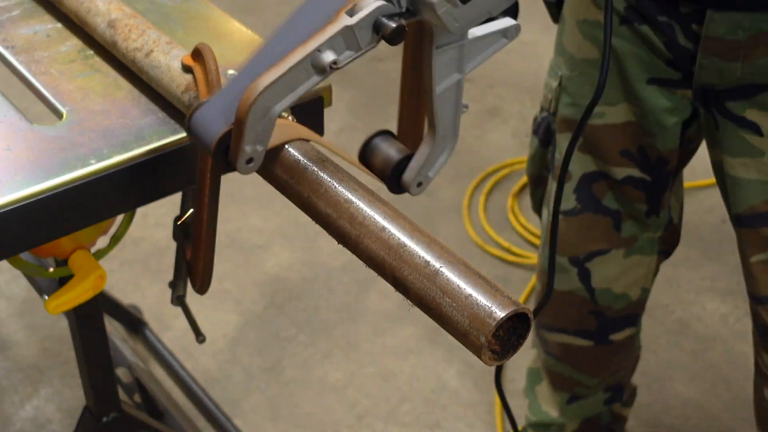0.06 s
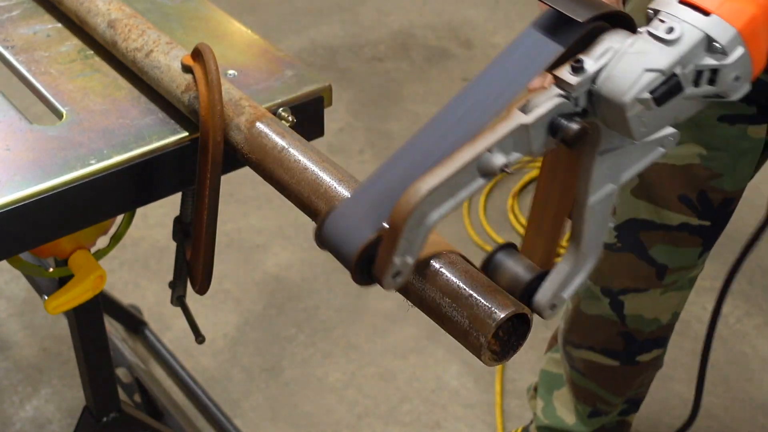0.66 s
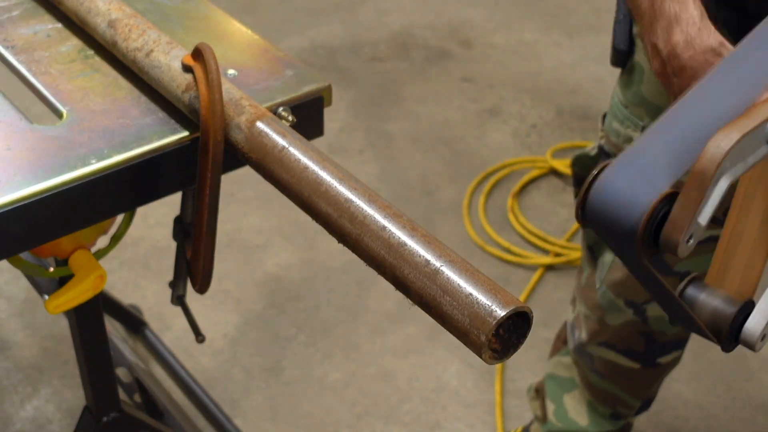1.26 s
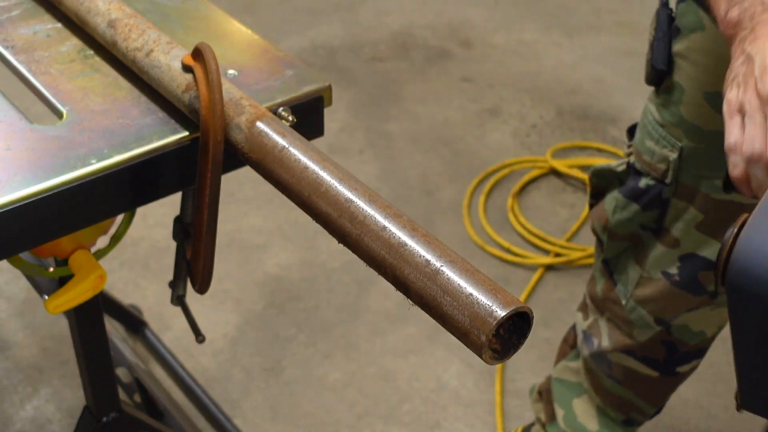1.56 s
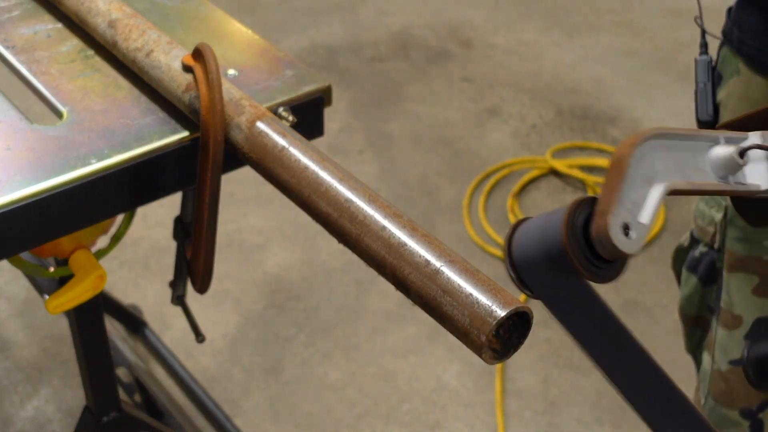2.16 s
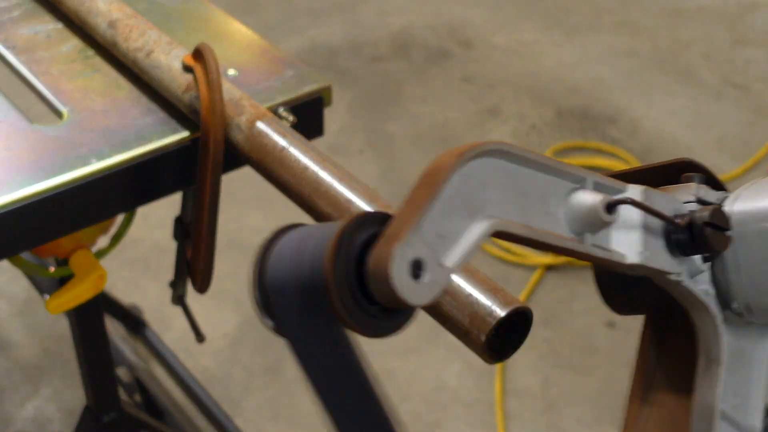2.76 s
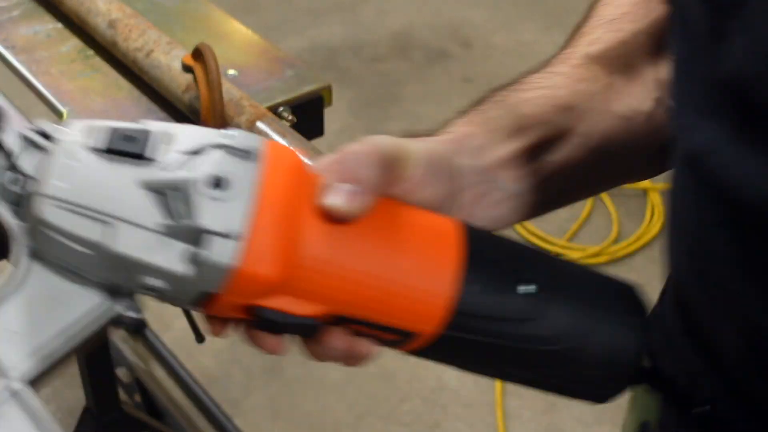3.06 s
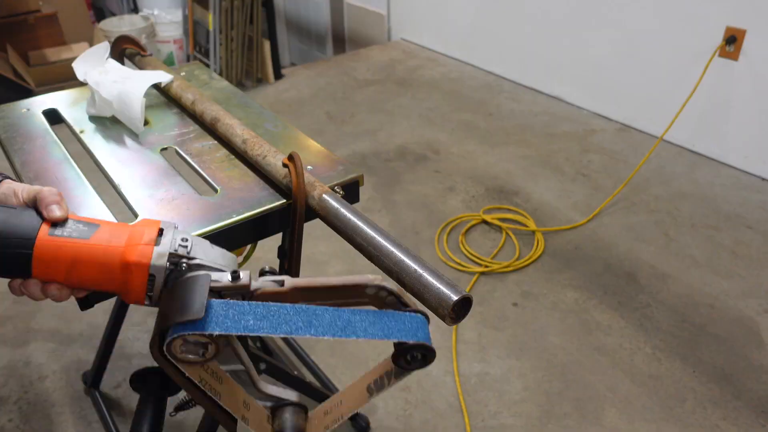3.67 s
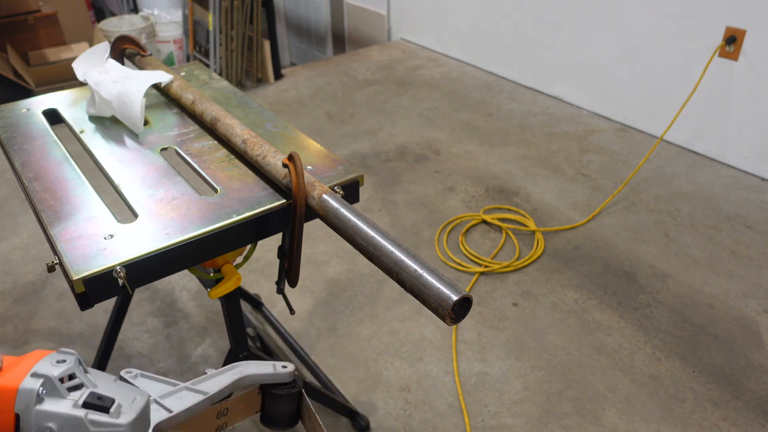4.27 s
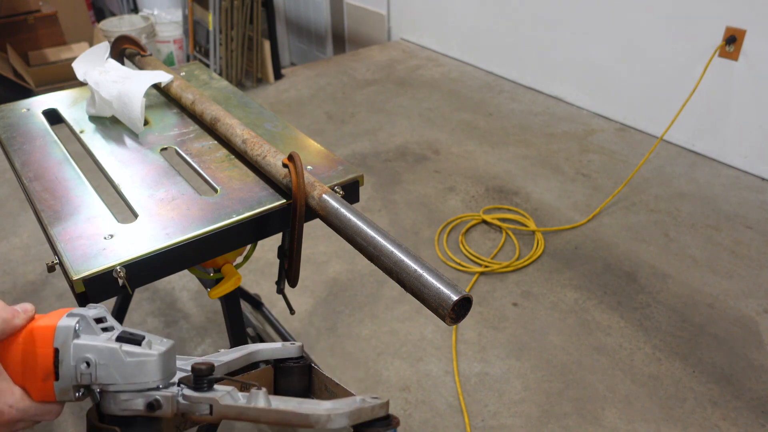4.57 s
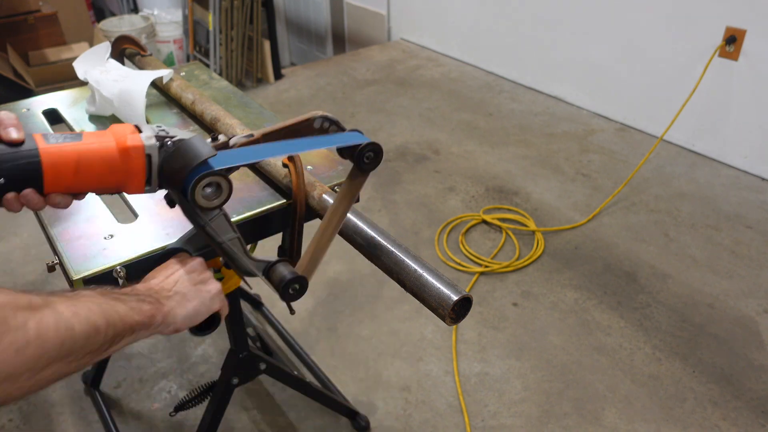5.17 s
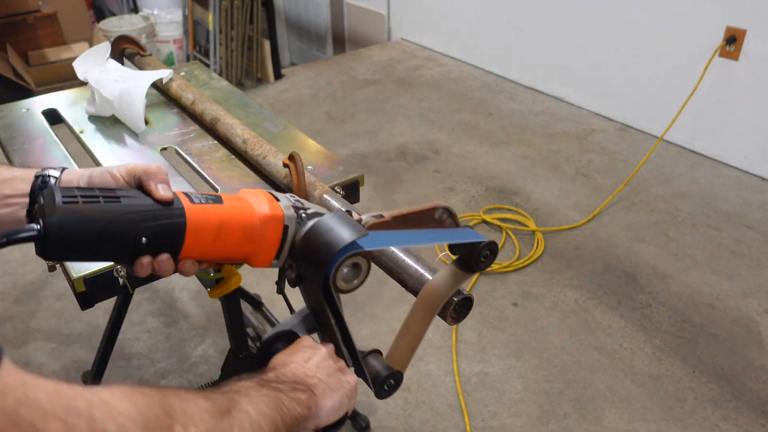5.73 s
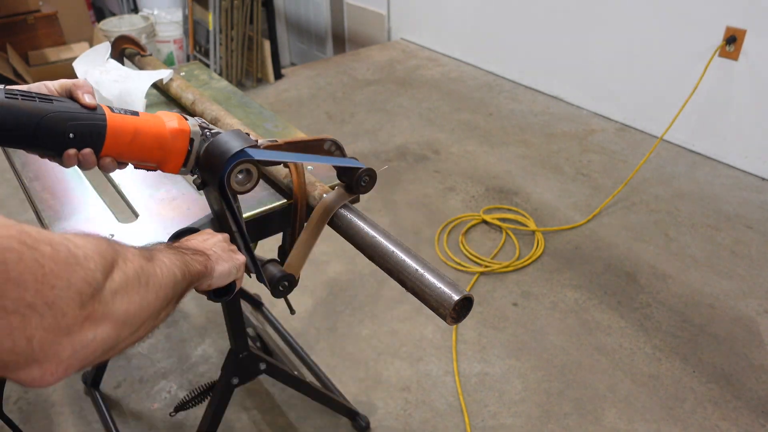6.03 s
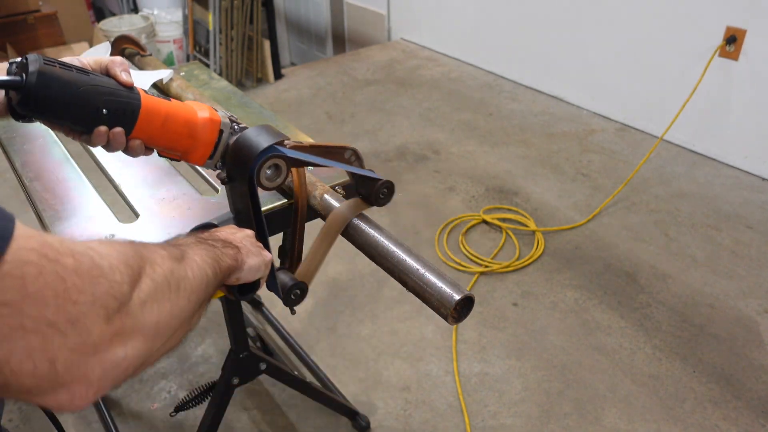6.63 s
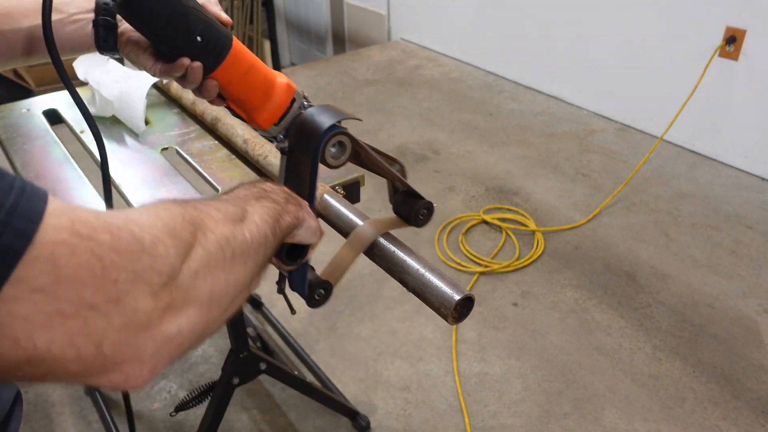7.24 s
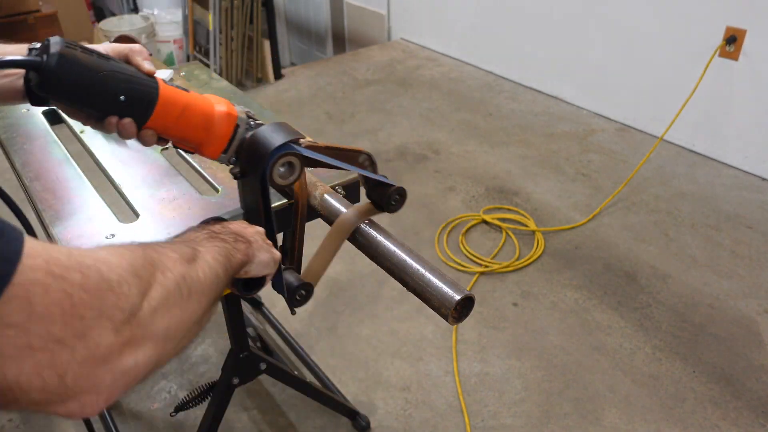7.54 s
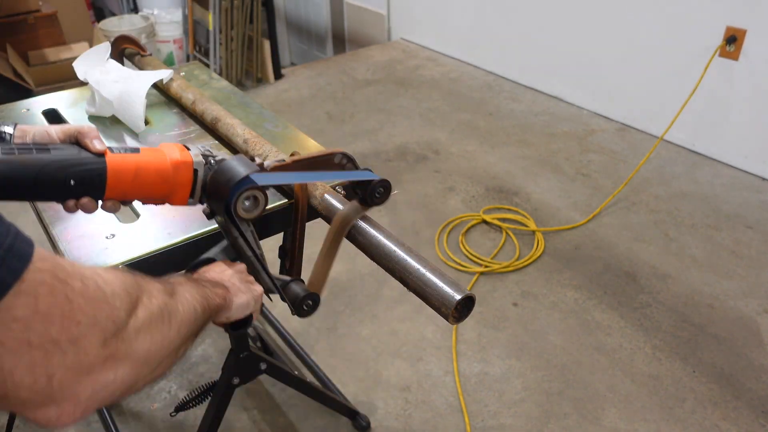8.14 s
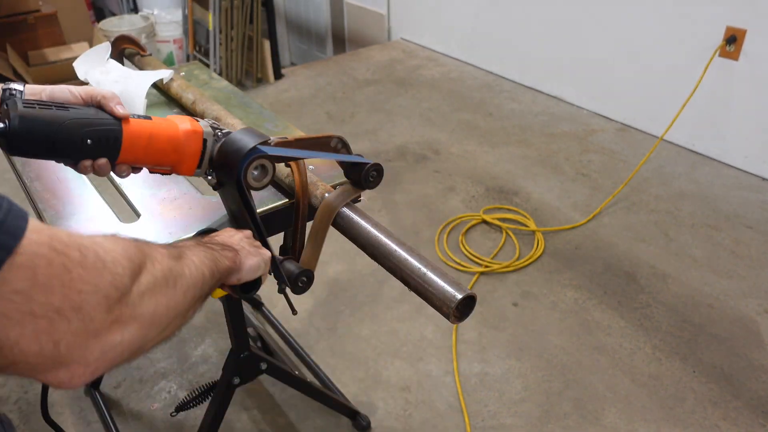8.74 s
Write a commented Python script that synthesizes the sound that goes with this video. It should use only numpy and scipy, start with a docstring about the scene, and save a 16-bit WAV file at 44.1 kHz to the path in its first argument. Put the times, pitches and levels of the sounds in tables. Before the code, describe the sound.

Close by in a quiet workshop, an electric belt sander whines and hisses as its belt rasps against a rusty steel pipe. The motor is cut and falls in pitch, its gears clattering to a stop. A short pause and a few sharp switch clicks follow. The sander then whirs back up and keeps grinding, its pitch wavering with the pressure.

```python
"""A handheld belt sander grinds rust off a steel pipe: the motor whines over fan air, belt rush and
brush hiss, and grit scrapes while the belt touches. It lifts off and runs free; near 2 s power is cut
and it coasts down, slack gears rattling their housing, to a stop at 3.5 s. After a pause in the quiet
room the switch clicks a few times. At 4.8 s the sander spins up, turned another way, and grinds on."""
import sys
import numpy as np
from scipy import signal
from scipy.fft import rfft, irfft
from scipy.io import wavfile
from scipy.ndimage import uniform_filter1d

SR = 44100
rng = np.random.default_rng(int(sys.argv[2]) if len(sys.argv) > 2 else 0)


def int16_out(signal):
    """Quantize to a 16-bit WAV file."""
    q = np.round(np.clip(np.atleast_2d(signal).T, -1, 1) * 32767)
    wavfile.write(sys.argv[1], SR, q.astype(np.int16))


N = 392490
TIME_S = np.arange(N) / SR
OFF_S, SLACK_S, STOP_S = 1.96, 2.25, 3.5  # power cut, gears slack, drive still
FREE_HZ, TOP_HZ = 985, 15750


def undb(db):
    """Decibels to gain."""
    return 10 ** (np.asarray(db) / 20)


def unit(x):
    """Scale to rms 1."""
    return x / np.sqrt(np.mean(x ** 2))


def curve(table, column=1):
    """One table column, interpolated linearly in time."""
    rows = np.array(table)
    return np.interp(TIME_S, rows[:, 0], rows[:, column])


def span(start_s, end_s, edge_s):
    """Smooth gate."""
    return (1 + np.tanh((TIME_S - start_s) / edge_s / 2)) * (1 + np.tanh((end_s - TIME_S) / edge_s / 2)) / 4


def bump(centre_s, width_s):
    """Bell-shaped swell."""
    return np.exp(-((TIME_S - centre_s) / width_s) ** 2)


def walk(rate_hz):
    """Smooth random wander, rms 1."""
    step = max(int(SR / rate_hz), 1)
    held = np.repeat(rng.standard_normal(N // step + 1), step)
    return unit(uniform_filter1d(held, step)[:N])


def grains(per_s, spread_db):
    """Tiny random impacts of unequal size."""
    hits = rng.random(N) < per_s / SR
    return hits * rng.standard_normal(N) * undb(spread_db * rng.standard_normal(N))


def turns(hz):
    """Running cycle count."""
    return np.cumsum(hz) / SR


def colour(x, outline):
    """Filter by a (Hz, dB) outline, falling 12 dB per octave below its first point."""
    hz, db = np.transpose(outline)
    f = np.maximum(np.fft.rfftfreq(len(x), 1 / SR), 1)
    response = undb(np.interp(np.log(f), np.log(hz), db)) * np.minimum(f / hz[0], 1) ** 2
    return irfft(rfft(x) * response, len(x))


def ring(x, modes):
    """Parallel resonances (Hz, width in Hz, dB) of alternating sign."""
    f = np.maximum(np.fft.rfftfreq(N, 1 / SR), 1)
    response = sum((-1) ** k * undb(db) / (1 + 1j * (f * f - hz * hz) / (f * width_hz))
                   for k, (hz, width_hz, db) in enumerate(modes))
    return irfft(rfft(x) * response, N)


def driven(law, hz, load):
    """Gain of a moving part; law is (free dB, loaded dB, exponent of speed)."""
    free_db, loaded_db, exponent = law
    return undb(free_db + (loaded_db - free_db) * load) * (hz / FREE_HZ) ** exponent


# Room noise spectrum. Each row: frequency in Hz, gain in dB.
ROOM_SPECTRUM = [(25, -13), (50, -5), (100, -3.5), (190, -5), (320, -7), (550, -10), (1200, -15),
                 (3000, -22), (6000, -27.5), (9000, -27), (15500, -32)]
def room_tone(level_db):
    """Steady low background noise."""
    return unit(colour(rng.standard_normal(N), ROOM_SPECTRUM)) * undb(level_db)


# Scuffs of the stopping belt and the hands; squeals of the belt on the pipe or rollers.
# Each row: centre in seconds, half-width in seconds, pitch in Hz, bandwidth in Hz, level in dB.
SCUFFS = [(2.64, 0.2, 3750, 650, -44), (3.18, 0.037, 100, 49.5, -67), (3.33, .09, 4850, 200, -60),
          (3.34, 0.06, 6000, 800, -51.5), (3.45, 0.045, 1790, 500, -65.5), (3.543, .012, 9060, 5000, -69),
          (3.89, 0.028, 5800, 702, -78.5)]
SQUEALS = [(.52, .08, 1900, 150, -36), (.72, 0.11, 13000, 1800, -34), (.9, .1, 2890, 250, -35.5),
           (1.04, 0.065, 12800, 1500, -29), (1.25, .08, 2440, 700, -33), (1.68, .07, 2500, 700, -32),
           (2.52, 0.2, 2100, 1000, -39), (4.83, 0.038, 2100, 900, -49), (4.95, .035, 2800, 1500, -39),
           (7.217, 0.23, 4180, 550, -34), (7.725, 0.033, 1714, 300, -39), (7.749, 0.052, 2950, 401, -39),
           (8.8, 0.065, 3200, 200, -39.5)]
def rubbing(swells):
    """Friction excites short swells of rough ringing."""
    bites = grains(9000, spread_db=2)
    return sum(unit(ring(bites, [(hz, bandwidth_hz, 0)])) * undb(db) * bump(centre_s, width_s)
               for centre_s, width_s, hz, bandwidth_hz, db in swells)


# Spectrum of a hard contact. Each row: frequency in Hz, gain in dB.
CONTACT_SPECTRUM = [(100, -13.5), (500, -0.5), (2000, -6), (5000, -8), (7500, -2.5), (11000, -11),
                    (15500, -1)]
# Switch clicks. Each row: start in seconds, peak in dB, tilt in dB per octave.
CLICKS = [(4.405, -29, 1.5), (4.4512, -57, 1), (4.4552, -50, 2), (4.4592, -41, 0.5), (4.469, -46, 2),
          (4.479, -22, 3), (4.6495, -32.5, 1), (4.7105, -39, 1.5)]
def switch(snap_s, body_s, body_db, tail_s, tail_db):
    """Each click is a sharp snap, a short plastic ring and a faint room tail."""
    out, t = np.zeros(N), np.arange(SR // 8) / SR
    decay = np.exp(-t / snap_s) + undb(body_db) * np.exp(-t / body_s)
    decay += undb(tail_db) * np.exp(-t / tail_s)
    lead = SR // 200
    for start_s, peak_db, tilt_db in CLICKS:
        burst = np.pad(decay * rng.standard_normal(len(t)), (lead, 0))
        click = colour(burst, [(hz, db + tilt_db * np.log2(hz)) for hz, db in CONTACT_SPECTRUM])
        start = int(start_s * SR) - lead
        out[start:start + len(click)] += undb(peak_db) * click / np.abs(click).max()
    return out


# Modes of the sander's arm. Each row: frequency in Hz, width in Hz, gain in dB.
ARM_MODES = [(105, 18, -12.5), (217, 21, 8), (370, 66, -1.5), (470, 48, 4)]
# Spells of droning. Each row: start in seconds, end in seconds, level in dB.
DRONES = [(2.13, 2.38, -62.5), (2.4, 3.1, -74), (4.818, 5.246, -64.5)]
def arm_drone():
    """The arm resonates during parts of the coast and the run-up."""
    envelope = sum(undb(db) * span(start_s, end_s, edge_s=.025) for start_s, end_s, db in DRONES)
    return unit(ring(rng.standard_normal(N), ARM_MODES)) * envelope


# Gear housing modes. Each row: frequency in Hz, width in Hz, gain in dB.
HOUSING_MODES = [(830, 182, -9), (1660, 110, 0.5), (2390, 600, -7), (3750, 610, -1.5), (4570, 160, 0.5),
                 (4900, 120, 3.5), (5300, 200, -1.5), (5706, 180, 2.5), (6340, 300, 1), (7060, 209, 4),
                 (7520, 256, -1), (7900, 800, -3), (8720, 350, 0), (9230, 280, -1), (10220, 400, -4),
                 (11100, 450, -5.5), (12120, 400, -2), (13200, 1100, -5), (15500, 1200, -13.5)]
def housing(force, direct_db):
    """The housing rings; a little of each contact is heard directly."""
    return ring(force, HOUSING_MODES) + undb(direct_db) * colour(force, CONTACT_SPECTRUM)


def knocks(rate_hz, decay_s, scatter_db):
    """One decaying pulse of random size per cycle."""
    cycle, phase = np.divmod(turns(rate_hz), 1)
    size = undb(scatter_db * rng.standard_normal(N))[cycle.astype(int)]
    return size * np.exp(-phase / rate_hz / decay_s)


# Bouts of gear rattle. Each row: centre in seconds, half-width in seconds, level in dB.
RATTLES = [(2.79, 0.044, -41), (2.97, 0.041, -42.5), (3.043, 0.046, -40.5), (3.166, 0.07, -47.5),
           (3.35, 0.069, -54.5)]
def gears(hz, level_db, rub_db, ratio, slowest_hz, fade_from_s, fade_db_per_s):
    """Slack teeth knock unevenly and ring the housing, over the rub of the slowing belt."""
    rate_hz = np.maximum(hz / ratio, slowest_hz) * undb(2 * walk(90))
    teeth = knocks(rate_hz, decay_s=.0017, scatter_db=3.5)
    force = rng.standard_normal(N) * (teeth + undb(rub_db))
    force /= np.sqrt(uniform_filter1d(force ** 2, size=1800))  # even out the level
    fade_db = fade_db_per_s * np.maximum(TIME_S - fade_from_s, 0)
    clatter = undb(level_db - fade_db) * span(SLACK_S, 10, edge_s=.09) * span(0, STOP_S, edge_s=.02)
    bout_power = sum((undb(db) * bump(centre_s, width_s)) ** 2 for centre_s, width_s, db in RATTLES)
    return unit(housing(force, direct_db=-13)) * np.sqrt(clatter ** 2 + bout_power)


# Hardest gear knocks. Each row: start in seconds, relative strength in dB.
JOLTS = [(2.843, -29), (2.967, -29), (2.973, -30), (2.986, -32), (3.015, -33), (3.029, -26), (3.038, -23),
         (3.046, -23), (3.054, -29), (3.161, -33), (3.212, -34), (3.218, -29.5)]
def jolts(contact_s, gain_db):
    """A few teeth slam across their backlash."""
    force, t = np.zeros(N), np.arange(SR // 100) / SR
    for start_s, db in JOLTS:
        blow = rng.standard_normal(len(t)) * np.exp(-t / contact_s)
        start = int(start_s * SR)
        force[start:start + len(t)] += undb(db) * blow / np.linalg.norm(blow)
    return housing(force, direct_db=-17) * undb(gain_db)


def roller_ticks(hz, ratio, level_db, peak_s, rise_db_per_s, fall_db_per_s):
    """The geared-down drive roller ticks brightly once a turn, loudest around peak_s."""
    force = knocks(hz / ratio, decay_s=.0016, scatter_db=2) * rng.standard_normal(N)
    t = TIME_S - peak_s
    crest_db = np.minimum(rise_db_per_s * t, -fall_db_per_s * t)
    return unit(ring(force, [(7000, 1400, -2), (10000, 3500, 0)])) * undb(level_db + crest_db)


def commutator_buzz(hz, multiples, smear_rad, level_db):
    """Rough overtones sink into hearing one after another as the motor slows."""
    phase = 2 * np.pi * turns(hz)
    tones = sum((k * hz < TOP_HZ) * np.sin(k * phase + smear_rad * walk(500)) for k in multiples)
    return tones * bump(2.62, .24) * undb(level_db)


# Brush spectra, runs 1 and 2. Each row: frequency in Hz, gain in dB.
BRUSH_SPECTRUM_1 = [(5000, -26.5), (9000, -8), (10200, -4.5), (11200, -3), (12200, -2.5), (13300, -1.5),
                    (14500, -6), (15800, -5)]
BRUSH_SPECTRUM_2 = [(5000, -35), (8800, -9.5), (10000, -7), (11300, -3.5), (12300, -3), (13200, -1),
                    (14500, -3.5), (15800, -1.5)]
def brush_hiss(hz, load, spectrum, law, unpowered_db=-6.5):
    """The brushes spark, less with the power off."""
    sparks = unit(colour(grains(24000, spread_db=2.3), spectrum))
    drop_db = unpowered_db * span(OFF_S, STOP_S, edge_s=.07)
    return sparks * undb(drop_db + .5 * walk(90)) * driven(law, hz, load)


# Fan air spectra, runs 1 and 2. Each row: frequency at full speed in Hz, gain in dB.
FAN_SPECTRUM_1 = [(200, -38.5), (700, -16.5), (1300, -8.5), (1900, -5), (2400, -1), (2950, -3), (3450, -4),
                  (4000, -14.5), (5500, -30), (9000, -45)]
FAN_SPECTRUM_2 = [(150, -35), (600, -15), (1100, -8), (1600, -4), (2400, -2), (3000, 1), (3600, -0.5),
                  (4200, -5.5), (7000, -29)]
def fan_air(hz, load, spectrum, law, droop):
    """Turbulent air; slower flow sounds lower."""
    turbulence = unit(colour(rng.standard_normal(N), spectrum))
    position = np.cumsum(np.minimum(hz / 920, 1) ** droop)
    air = np.interp(position, np.arange(N), turbulence)
    return air * undb(.42 * walk(40)) * driven(law, hz, load)


# The tool turning towards and away from the listener.
# Each row: time in seconds, fan tone gain in dB, belt rush gain in dB.
AIM = [(.1, -5, -1.5), (.9, 2, 0), (1.15, -4.5, -.5), (1.5, 2.5, -1), (1.67, -1, 0.3), (2.25, 5.5, 1),
       (2.8, -5, -2.5), (5.1, -2.5, 0), (5.5, -7, -0.5), (6.2, -2.5, 0.5), (7.35, 5.5, 1.5), (8.1, 1, 0.6),
       (8.5, 4, 0.5)]
# Belt spectra, runs 1 and 2. Each row: frequency in Hz, gain in dB.
BELT_SPECTRUM_1 = [(2500, -32), (4000, -10), (4900, -9.5), (5500, -4), (6100, -2.5), (6750, 1),
                   (7400, -3.5), (8500, -8.5), (9600, -17.5), (13000, -38)]
BELT_SPECTRUM_2 = [(2500, -37), (3900, -4.5), (4700, 0), (5800, -0.5), (6700, -2.5), (7500, -7),
                   (8800, -18), (12000, -16.5)]
def belt_rush(hz, load, spectrum, law):
    """The belt crackles over its rollers."""
    crackle = unit(colour(grains(18000, spread_db=1.6), spectrum))
    return crackle * undb(curve(AIM, column=2) + .57 * walk(60)) * driven(law, hz, load)


# Grit spectra, runs 1 and 2. Each row: frequency in Hz, gain in dB.
GRIT_SPECTRUM_1 = [(50, -23.5), (85, -13), (130, -7), (250, -0.5), (600, 2.5), (1300, -1), (2500, -14.5),
                   (4700, -8), (6300, -12.5), (7200, 0), (8300, 2), (9050, 3.5), (9700, -14),
                   (15000, -16.5)]
GRIT_SPECTRUM_2 = [(60, -48), (110, -24), (180, -9), (320, -1.5), (600, 3), (1300, 4.5), (2200, 1),
                   (4000, -15.5), (9000, -11.5), (15000, -29)]
def scrape(hz, pressure, spectrum, gain_db, free_db, exponent, chatter_db, hand_db):
    """Grit tears at the rust under an unsteady hand; the lifted belt still rasps on its rollers."""
    cuts = grains(9000, spread_db=3) * undb(chatter_db * walk(120) + hand_db * walk(18))
    contact = np.hypot(pressure, undb(free_db))
    return unit(colour(cuts, spectrum)) * undb(gain_db) * contact * (hz / FREE_HZ) ** exponent


# Motor tones, runs 1 and 2, one row per multiple of the pitch.
# Each row: free gain in dB, loaded gain in dB, exponent of speed.
TONE_LAWS_1 = [(-39.5, -54.5, 2.4), (-35.5, -44, 3.5), (-53.5, -43.5, 2), (-43.5, -57.5, 9)]
TONE_LAWS_2 = [(-45, -51, 2), (-47, -50, 1.2), (-35.5, -42.5, 2.4), (-52, -39, 2.2)]
def whine(hz, load, laws, fan_db, multiples, jitter, flutter_db, sway_db, ripple_db, armature_db):
    """Tones of one slightly unsteady shaft: the lowest is the fan, the highest the commutator."""
    phase = 2 * np.pi * turns(hz * (1 + jitter * walk(70)))
    ripple_phase = 2 * np.pi * 4 * 60 * TIME_S  # fourth harmonic of 60 Hz mains
    out = np.zeros(N)
    for k, law in zip(multiples, laws):
        tone = np.sin(k * phase)
        if k == multiples[0]:
            tone *= undb(fan_db)
        if k == multiples[-1]:  # side tones from mains ripple and the turning armature
            tone += undb(ripple_db) * np.sin(k * phase - ripple_phase)
            tone += undb(armature_db) * np.sin((k + 2) * phase)
        waver = undb(flutter_db * walk(45) + sway_db * walk(7))
        out += np.sqrt(2) * tone * driven(law, hz, load) * waver
    return out


# Strokes on the pipe. Each row: start in seconds, end in seconds, pressure in dB.
STROKES = [(-.1, 0.527, 0), (0.548, 1.12, 1), (1.42, 1.566, -9.5), (5.3, 5.79, 1), (5.82, 7.415, 0.1),
           (7.432, 8.35, -0.4), (8.53, 9, 0)]
def belt_pressure():
    """The belt seats and lifts quickly on each stroke."""
    return sum(undb(db) * span(start_s, end_s, edge_s=.012) for start_s, end_s, db in STROKES)


# Powered motor speed, sagging under load. Each row: time in seconds, whine pitch in Hz.
SPEED_1 = [(0.13, 932), (0.35, 944), (1.08, 947), (1.25, 990), (1.38, 1006), (1.65, 975), (1.96, 947)]
def first_run(pressure, coast_s, friction_hz):
    """Grind, lift off, then coast down against air drag and dry friction."""
    drag = np.exp(-np.maximum(TIME_S - OFF_S, 0) / coast_s)
    hz = np.maximum((curve(SPEED_1) + friction_hz) * drag - friction_hz, 10)
    load = np.minimum(uniform_filter1d(pressure, size=5000), 1)
    out = whine(hz, load, TONE_LAWS_1, fan_db=curve(AIM), multiples=(1, 3, 6, 12), jitter=.0018,
                flutter_db=.8, sway_db=.4, ripple_db=-14.5, armature_db=-10.5)
    out += fan_air(hz, load, FAN_SPECTRUM_1, law=(-30, -30.5, 2.07), droop=.4)
    out += belt_rush(hz, load, BELT_SPECTRUM_1, law=(-29.5, -31.5, 3))
    out += brush_hiss(hz, load, BRUSH_SPECTRUM_1, law=(-30, -27.5, 1.1))
    out += scrape(hz, pressure, GRIT_SPECTRUM_1, gain_db=-31, free_db=-8, exponent=3.5,
                  chatter_db=.5, hand_db=1.8)
    out *= span(-1, 2.89, edge_s=.026)  # these die away before the gears stop
    out += gears(hz, level_db=-37.5, rub_db=-5.5, ratio=2.7, slowest_hz=138,
                 fade_from_s=2.697, fade_db_per_s=41)
    out += jolts(contact_s=.00071, gain_db=13)
    out += commutator_buzz(hz, multiples=(24, 30), smear_rad=1.5, level_db=-45)
    out += roller_ticks(hz, ratio=8.5, level_db=-38.5, peak_s=2.12, rise_db_per_s=59, fall_db_per_s=54)
    return out


# Working speed of the motor. Each row: time in seconds, whine pitch once spun up in Hz.
SPEED_2 = [(5.27, 986), (5.4, 925), (5.56, 911), (5.83, 947.4), (6.05, 938), (6.65, 931.4), (7.05, 934.5),
           (7.22, 943), (7.5, 938), (7.72, 932), (8.03, 945), (8.18, 939), (8.3, 949), (8.42, 997),
           (8.5, 1005), (8.76, 884), (8.9, 918)]
def second_run(pressure, power_on_s, fade_in_s, turning_s, spin_up_s, sag_hz):
    """Spin up and grind on; a speed sag of sag_hz counts as full load."""
    working_hz = curve(SPEED_2)
    spin_up = 1 - np.exp(-np.maximum(TIME_S - turning_s, 0) / spin_up_s)
    hz = working_hz * np.maximum(spin_up, .1)
    load = np.clip((FREE_HZ - working_hz) / sag_hz, 0, 1.1)
    fan_db = curve(AIM) + 11.5 * bump(4.97, .12)  # the lowest tone sings out in the run-up
    out = whine(hz, load, TONE_LAWS_2, fan_db, multiples=(2, 4, 6, 12), jitter=.00168,
                flutter_db=2, sway_db=1.5, ripple_db=-5, armature_db=-8)
    out += fan_air(hz, load, FAN_SPECTRUM_2, law=(-37, -36.5, .69), droop=.08)
    out += belt_rush(hz, load, BELT_SPECTRUM_2, law=(-31, -31.5, 1))
    out += brush_hiss(hz, load, BRUSH_SPECTRUM_2, law=(-25, -26, .45))
    out += scrape(hz, pressure, GRIT_SPECTRUM_2, gain_db=-38.5, free_db=-10, exponent=3.3,
                  chatter_db=.24, hand_db=.65)
    return out * np.clip((TIME_S - power_on_s) / fade_in_s, 0, 1) ** .93


def workshop(x, early_db, early_s, tail_db, t60_s):
    """Quick reflections off tool, pipe and bench, then a weak tail from floor and walls."""
    t = np.arange(SR // 2) / SR
    early = rng.standard_normal(len(t)) * np.exp(-t / early_s) * (t > .001)
    early = colour(early, [(1500, 0), (TOP_HZ, 0)])  # small surfaces reflect no bass
    tail = rng.standard_normal(len(t)) * np.exp(-np.log(1000) * t / t60_s) * (t > .004)
    echoes = undb(early_db) * early / np.linalg.norm(early) + undb(tail_db) * tail / np.linalg.norm(tail)
    return x + signal.fftconvolve(x, echoes)[:N]


def scene():
    """Both runs, clicks and scuffs over the quiet room, the same in both channels."""
    pressure = belt_pressure()
    tool = arm_drone() + first_run(pressure, coast_s=1.22, friction_hz=300)
    tool += second_run(pressure, power_on_s=4.757, fade_in_s=.066, turning_s=4.792,
                       spin_up_s=.12, sag_hz=46)
    tool += rubbing(SQUEALS)
    tool = workshop(tool, early_db=-17, early_s=.003, tail_db=-14, t60_s=.19)
    clicks = switch(snap_s=.00095, body_s=.0048, body_db=-18, tail_s=.02, tail_db=-30)
    return np.tile(tool + clicks + room_tone(level_db=-71) + rubbing(SCUFFS), (2, 1))


def record(dry):
    """Steep low-pass at TOP_HZ."""
    return signal.sosfilt(signal.ellip(12, .1, 80, TOP_HZ, fs=SR, output="sos"), dry)


dry = scene()
out = record(dry)
int16_out(out)
```